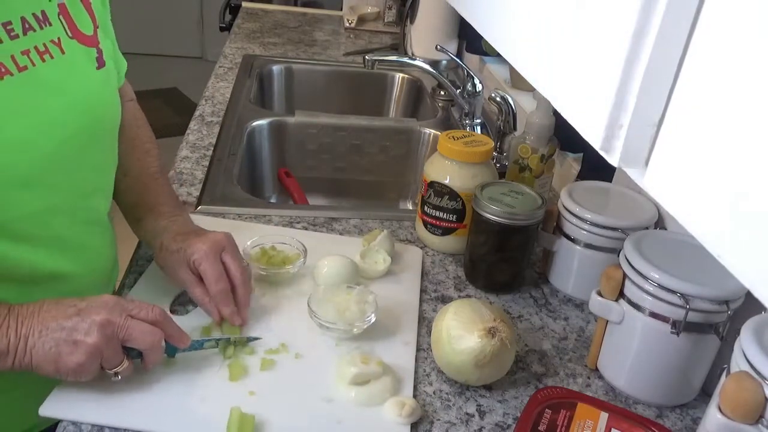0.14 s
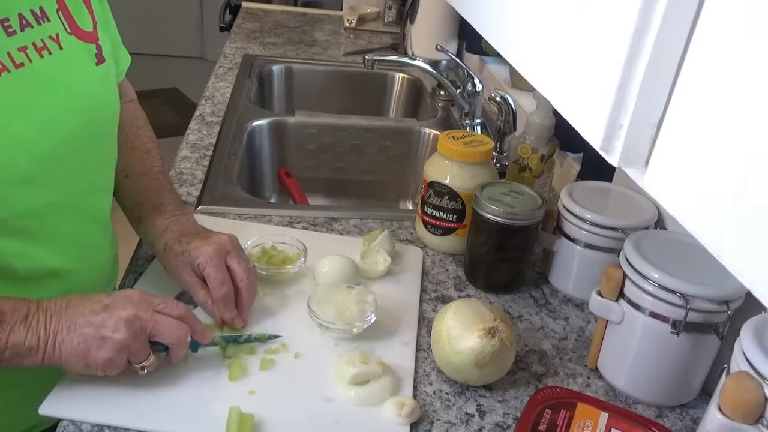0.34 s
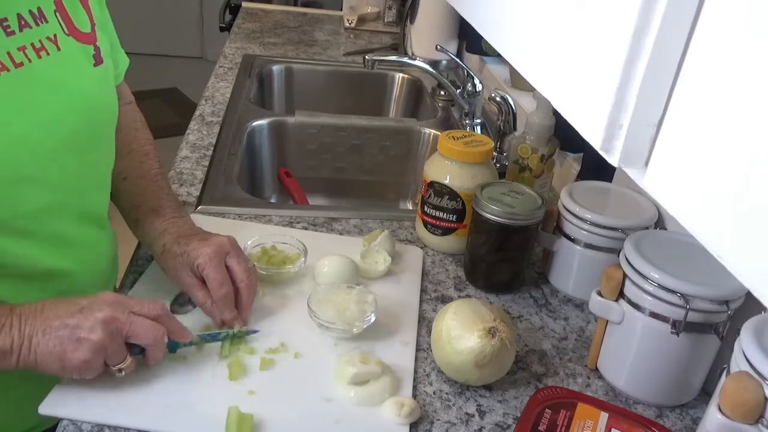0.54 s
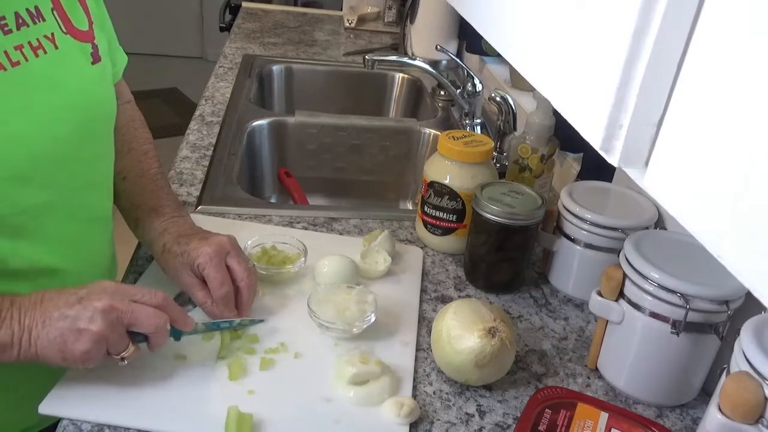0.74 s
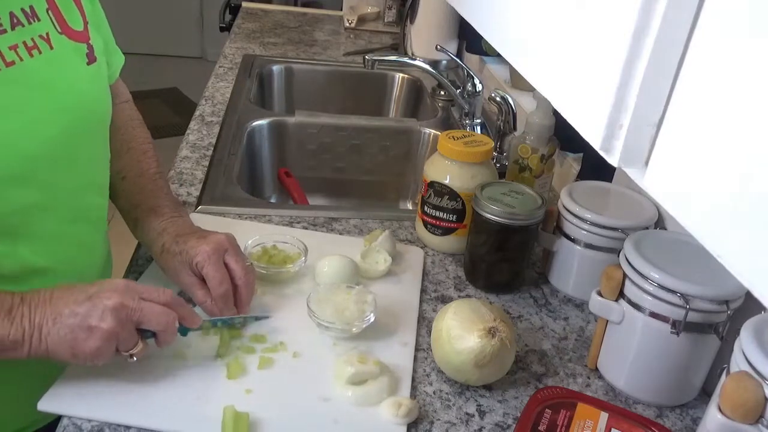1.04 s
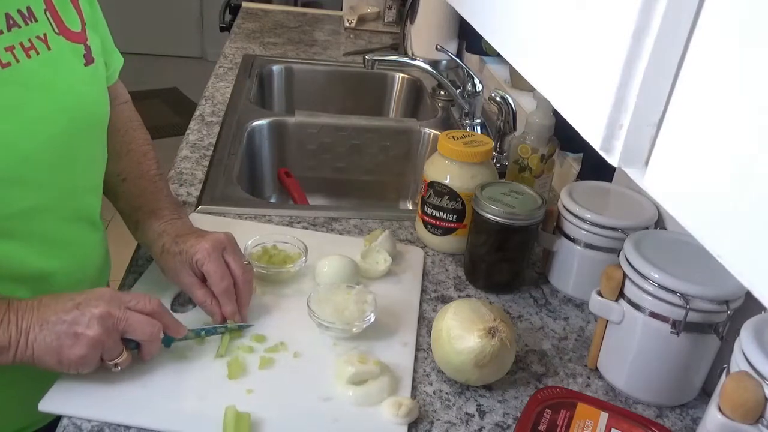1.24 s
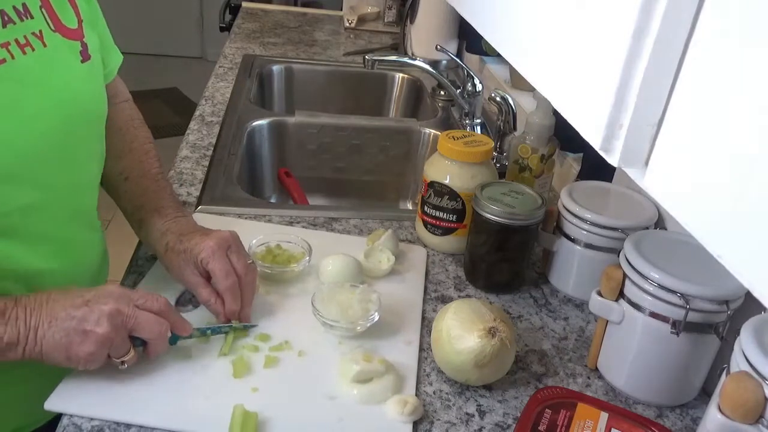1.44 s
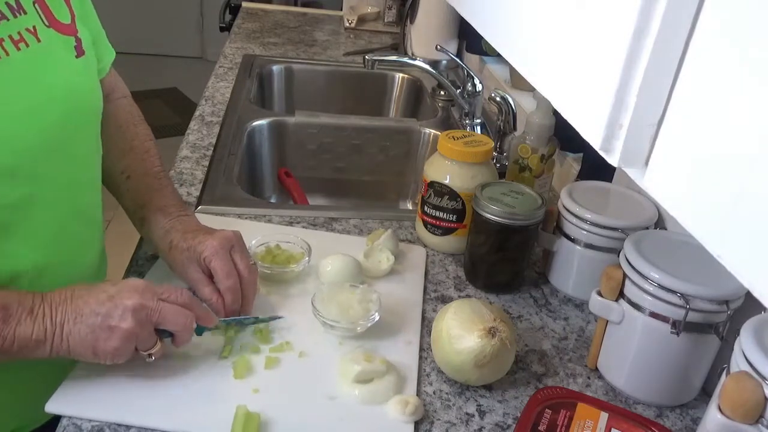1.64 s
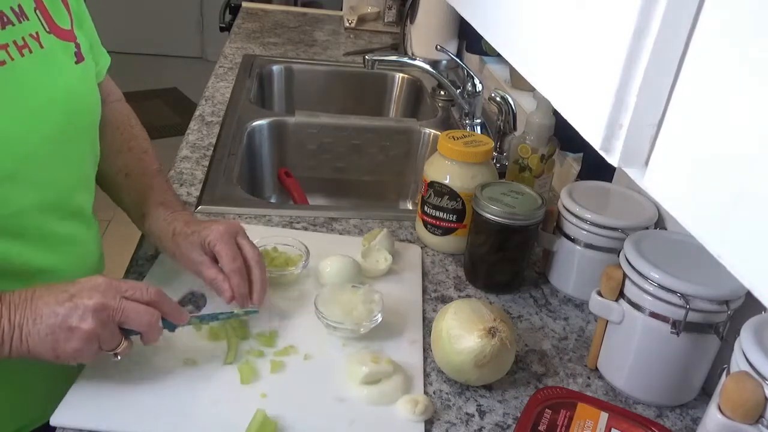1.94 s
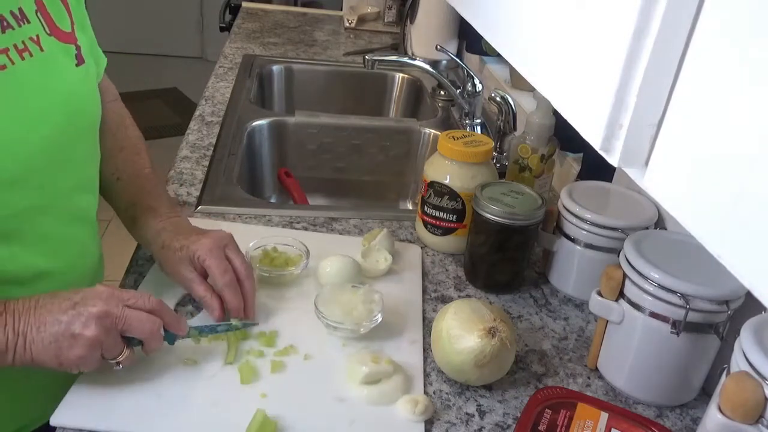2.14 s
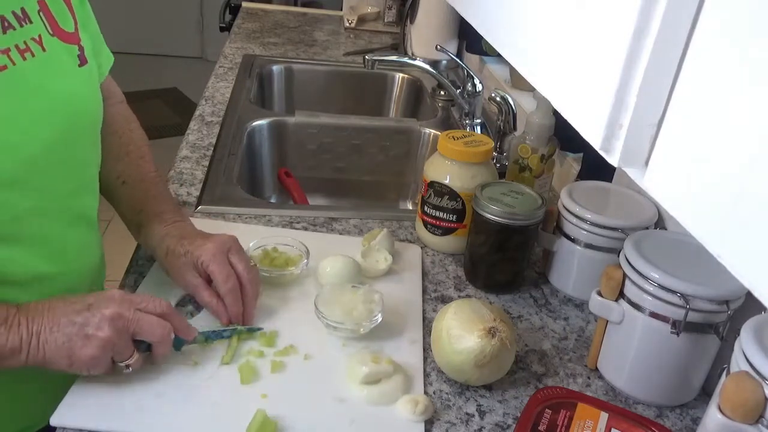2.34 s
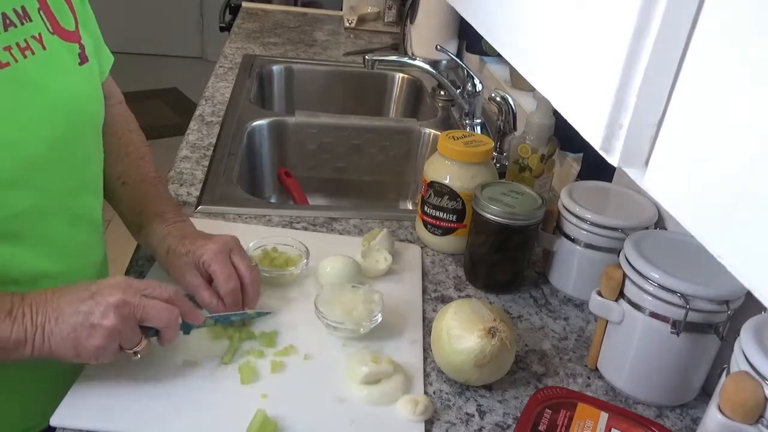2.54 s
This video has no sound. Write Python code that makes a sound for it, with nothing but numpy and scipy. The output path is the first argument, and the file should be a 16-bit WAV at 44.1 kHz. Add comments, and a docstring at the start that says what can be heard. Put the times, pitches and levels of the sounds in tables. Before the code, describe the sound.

Celery is chopped with a small knife on a plastic board, heard close up. Crackly snaps build into sharp, hollow knocks at about 0.25, 0.6 and 0.9 seconds. Softer crunches follow around 1.2, after a pause a knock at 1.5, then light blade taps near 1.8 and 2.2 and a crunchy last chop at 2.4. Faint rustling, short kitchen echo and low appliance hum surround it.

```python
"""Chopping celery

A small knife chops celery on a plastic board on a stone kitchen counter, heard close up.
Stroke by stroke, bursts of cracks excite stalk and blade, and landings ring the modes of the board.
Fingers rustle wet pieces (crackling noise), the blade tip taps (damped modes), the hard kitchen
answers (sparse decaying impulses) and appliances drone (shaped noise and wavering lines)."""
import sys
import numpy as np
from scipy import signal
from scipy.io import wavfile
from scipy.ndimage import uniform_filter1d

SR = 44100
rng = np.random.default_rng(int(sys.argv[2]) if len(sys.argv) > 2 else 0)


def convert_level_to_amplitude(level_db):
    """Map a level in decibels to its linear amplitude factor."""
    exponent = np.asarray(level_db, float) / 20
    return 10 ** exponent


def master(y):
    """Save y as 16-bit WAV."""
    cut = np.clip(np.atleast_2d(y).T, -1, 1)
    pcm = np.round(cut * 32767)  # scale
    wavfile.write(sys.argv[1], SR, pcm.astype(np.int16))


N = 119070
LOW_BELOW_HZ = 1300  # divides low from upper board modes
RISE_S = .0003  # onset of board and tip modes


def evened(x):
    """Scales to rms 1."""
    return x / np.sqrt(np.mean(x ** 2) + 1e-20)


def read(points, hz):
    """Interpolates (Hz, value) points on a log-frequency axis."""
    f, value = np.transpose(points)
    return np.interp(np.log(hz + 1), np.log(f + 1), value)


def add(mix, start_s, sound):
    """Mixes a sound in at a time."""
    part = mix[round(start_s * SR):][:len(sound)]
    part += sound[:len(part)]


def resonate(x, hz, width_hz):
    """Two-pole resonance of gain 1."""
    return signal.lfilter(*signal.iirpeak(min(hz, SR / 2.1), hz / width_hz, SR), x)


def modes(table, t):
    """Sum of dying sines; neighbours start in opposite directions."""
    return sum((-1) ** k * convert_level_to_amplitude(db - 60 * t / t60) * np.sin(2 * np.pi * hz * t)
               for k, (hz, db, t60) in enumerate(table))


def crisp():
    """Short causal filter with the colour of the stalk, energy 1."""
    # Colour of snaps. Each row: frequency in Hz, relative level in dB.
    colour_points = [(470, -31.5), (800, -12.5), (1800, -11), (2620, -11), (3760, -10), (4790, -10.5),
                     (5770, -8), (9250, -3), (11000, -17.5), (14300, -60), (22000, -120)]
    hz = np.fft.rfftfreq(256, 1 / SR)
    db = read(colour_points, np.minimum(hz, 10000))  # level held above 10 kHz
    # minimum_phase takes the root of the magnitude, hence twice the dB
    linear_phase = signal.firwin2(255, hz, convert_level_to_amplitude(2 * db) + 1e-5, fs=SR)
    colour = signal.minimum_phase(linear_phase)
    return colour / np.linalg.norm(colour)


def rustle():
    """Fingers shift the cut pieces: faint dense crackle of uneven noise grains."""
    # Loudness course. Each row: time in seconds, rms level in dB.
    loudness = [(0, -50), (.13, -58), (.2, -45.5), (.45, -63), (.53, -67.5), (1.41, -80), (1.47, -41),
                (1.52, -53), (2.15, -72), (2.25, -77), (2.6, -94), (2.7, -59)]
    unevenness = convert_level_to_amplitude(3 * rng.standard_normal(N // 100 + 1)).repeat(100)[:N]
    grains = rng.standard_normal(N) * unevenness
    high = np.diff(np.convolve(grains, crisp())[:N + 1])
    s, db = np.transpose(loudness)
    return convert_level_to_amplitude(np.interp(np.arange(N) / SR, s, db)) * evened(high)


def drone():
    """Appliances: patchy broadband noise and wavering motor lines, as mid and side."""
    # Noise spectrum. Each row: frequency in Hz, relative level in dB per Hz.
    spectrum = [(15, -42), (25, -14), (85, -12), (153, -27), (224, -7.5), (392, -9), (468, -4.5),
                (604, -17.5), (652, -16), (1030, -26.5), (1630, -25), (4290, -38), (5260, -35),
                (11000, -47), (14300, -73), (22000, -120)]
    # Width. Each row: frequency in Hz, side minus mid in dB.
    side_points = [(60, -17), (220, -27.5), (800, -8), (2900, -4.5), (10600, -4.5)]
    # Motor lines. Each row: frequency in Hz, level in dB rms before waver.
    lines = [(59, -64), (93, -59.5), (118, -63), (270, -63)]
    noise_db, patchy_db, waver_db = -46, 1.3, 1.2  # mid rms, then two rms spreads

    frames, hz = N // 512 + 5, np.fft.rfftfreq(2048, 1 / SR)
    a, b, c, d, patches = rng.standard_normal((frames, 1025, 5)).T
    patches = evened(uniform_filter1d(uniform_filter1d(patches, 10, 0), 6, 1))
    mid = a + 1j * b
    side = (c + 1j * d) * convert_level_to_amplitude(read(side_points, hz))[:, None]
    z = np.array([mid, side]) * convert_level_to_amplitude(read(spectrum, hz)[:, None] + patchy_db * patches)
    out = signal.istft(z, nperseg=2048, noverlap=1536)[1][:, :N]
    out *= convert_level_to_amplitude(noise_db) / np.sqrt(np.mean(out[0] ** 2))

    t = np.arange(N) / SR
    for f, db in lines:
        waver = evened(np.interp(t, np.arange(40) / 12, rng.standard_normal(40)))
        sine = np.sin(2 * np.pi * (f * t + rng.random()))
        out[0] += np.sqrt(2) * convert_level_to_amplitude(db + waver_db * waver) * sine
    return out


def taps():
    """Light taps of the blade tip: each rings three close, quickly damped modes."""
    # Each row: start in seconds, level per mode in dB, middle mode in Hz.
    tap_rows = [(.1445, -37, 2800), (1.808, -35, 3000), (2.204, -40, 3000)]
    t60_s = 0.0073
    out, t = np.zeros(N), np.arange(2000) / SR
    for s, db, hz in tap_rows:
        ring = modes([(hz * k, db, t60_s) for k in (.7, 1, 1.3)], t)
        add(out, s, ring * (1 - np.exp(-t / RISE_S)))
    return out


def snap(length_s, db, ring_hz, thump_db):
    """Uneven tiny cracks ring stalk and blade, trail off in tearing; the stalk is pushed on the board.

    Returns the near sound and the smoother colour that the walls receive from all directions."""
    # Stalk pushed on the board. Each row: frequency in Hz, relative level in dB, t60 in seconds.
    thump_modes = [(110, -17, 0.075), (236, -8, 0.04), (681, 5, 0.011)]
    # Blade modes woken by the cracks. Each row: frequency in Hz, relative mean level in dB.
    blade_modes = [(3900, -13), (5800, -11), (7600, -9), (9300, -10)]
    cracks_per_s, size_spread_db = 11000, 5
    rise_s, fade_s, thump_rise_s = 0.00026, .0015, 0.0023
    tear_db, tear_s, tears_per_s = -19, .012, 1500  # slower ragged tearing
    stalk_db, stalk_width_hz = -11, 800
    blade_spread_db, blade_width_hz = 4, 350

    t = np.arange(4000) / SR
    u = rng.random((len(t), 4))
    size = np.sign(u[:, 1] - .5) * convert_level_to_amplitude(-size_spread_db * np.log(u[:, 2] + 0.04))
    shape = np.minimum(t / rise_s, 1) * np.exp(-np.maximum(t - length_s, 0) / fade_s)
    cracks = shape * size * (u[:, 0] < cracks_per_s / SR)
    cracks *= np.linalg.norm(shape) / np.linalg.norm(cracks)
    cracks += convert_level_to_amplitude(tear_db) * np.exp(-t / tear_s) * size * (u[:, 3] < tears_per_s / SR)

    wide = np.convolve(cracks, crisp())[:len(t)]
    stalk_gain = convert_level_to_amplitude(stalk_db) * np.sqrt(SR / stalk_width_hz / np.pi)
    ring = stalk_gain * resonate(cracks, ring_hz, stalk_width_hz)
    for (hz, mode_db), a in zip(blade_modes, rng.standard_normal(len(blade_modes))):
        gain = convert_level_to_amplitude(mode_db + blade_spread_db * a) * np.sqrt(SR / blade_width_hz / np.pi)
        ring += gain * resonate(cracks, hz, blade_width_hz)
    thump = convert_level_to_amplitude(thump_db) * modes(thump_modes, t) * (1 - np.exp(-t / thump_rise_s))

    spread = thump.copy()
    add(spread, length_s / 2, np.linalg.norm(shape) * crisp())
    return convert_level_to_amplitude(db) * (wide + ring + thump), convert_level_to_amplitude(db) * spread


def blow(db, tick_db, low_db, tilt_db):
    """Blade lands: a sharp tick of the edge, then board modes, changed a little by random draws.

    Returns tick, ring and the ring as sent to all sides, where modes merge into broader ones."""
    # Board and blade. Each row: frequency in Hz, relative level in dB, t60 in seconds.
    board_modes = [(202, -16, 0.028), (430, -14.5, 0.013), (549, -10.5, 0.035), (713, -3, 0.043),
                   (1096, -4, 0.012), (1360, -5, 0.0033), (1684, -1.5, 0.0094), (2076, 6, 0.0074),
                   (2554, 3, 0.012), (2980, 9, 0.015), (2985, 8.5, 0.011), (3172, 0, 0.0089),
                   (4600, -15, 0.0048)]
    detune, ring_lag_s = .008, 0.00097
    upper_t60_max_s, spread_t60_s = .013, .005
    tick_gain_db, tick_hz, tick_s = 6.5, 4400, .00012

    t = np.arange(5000) / SR
    draw = rng.standard_normal((len(board_modes), 2))
    here = []
    for (f, d, t60), (a, b) in zip(board_modes, draw):
        if f < LOW_BELOW_HZ:
            d = d + low_db
        else:
            d = d + tilt_db * np.log2(f / 2200)
            t60 = min(t60, upper_t60_max_s)
        here.append((f * (1 + detune * a), d + b, t60))
    ring = np.zeros(len(t))
    add(ring, ring_lag_s, modes(here, t) * (1 - np.exp(-t / RISE_S)) / 2)

    at = t - 2 * tick_s
    pulse = np.exp(-(at / tick_s) ** 2) * np.sin(2 * np.pi * tick_hz * at)
    tick = -convert_level_to_amplitude(tick_gain_db + tick_db) * pulse

    merged = []
    for f, d, t60 in here:
        short_t60 = min(t60, spread_t60_s)
        merged.append((f, d + 10 * np.log10(t60 / short_t60), short_t60))  # same energy
    spread = modes(merged, t) / 2
    return convert_level_to_amplitude(db) * tick, convert_level_to_amplitude(db) * ring, convert_level_to_amplitude(db) * spread


def echoes(x):
    """Direct sound plus first reflections, which return mostly the upper modes."""
    # Counter and walls. Each row: delay in seconds, level in dB.
    reflections = [(.0016, -17), (.0036, -2), (.0064, -4.5), (.0085, -3.5), (.011, -4)]
    out = x.copy()
    upper = signal.lfilter(*signal.butter(2, LOW_BELOW_HZ, "high", fs=SR), x)
    for k, (delay_s, db) in enumerate(reflections):
        add(out, delay_s, (-1) ** k * convert_level_to_amplitude(db) * upper)
    return out


def kitchen(x):
    """Reverberation: sparse impulses dying band by band, three tails in turn; mid and side."""
    # Decay. Each row: frequency in Hz, t60 in seconds.
    decay = [(200, 0.39), (530, 0.36), (1390, 0.38), (3680, 0.32), (9700, 0.31)]
    # Width. Each row: frequency in Hz, side minus mid in dB.
    side_points = [(150, -24), (500, -10), (2000, -6.5), (9000, -7)]
    build_s, turn_rad_per_s = 0.0017, 9
    out, count = np.zeros((2, N)), SR // 2
    for k in range(3):
        impulses = np.zeros((2, count))
        at = np.arange(100, count - 20, 20)
        at = at + rng.integers(0, 20, (2, len(at)))
        np.put_along_axis(impulses, at, rng.choice([-1., 1.], at.shape), 1)
        hz, t, z = signal.stft(impulses, SR, nperseg=256)
        z[1] *= convert_level_to_amplitude(read(side_points, hz))[:, None]
        fading = convert_level_to_amplitude(-60 * t / read(decay, hz)[:, None])
        tail = signal.istft(z * fading, SR, nperseg=256)[1]
        tail *= 1 - np.exp(-np.arange(tail.shape[1]) / SR / build_s)
        tail /= np.linalg.norm(tail[0])
        # squares of the three weights sum to 1
        turn = np.sqrt(2 / 3) * np.cos(np.arange(N) / SR * turn_rad_per_s + k * np.pi / 3)
        out += signal.fftconvolve((x * turn)[None], tail, axes=1)[:, :N]
    return out


def scene():
    """Blows, snaps, taps and rustle in the kitchen over the drone."""
    # Fibres snap. Each row: start in seconds, length in seconds.
    snap_times = [(.159, .004), (.19, .006), (.2355, .002), (.2424, .0014), (.345, .003), (.37, .003),
                  (.42, .003), (.548, .005), (.5535, .002), (.5745, .005), (.5875, .0015), (.5905, .002),
                  (.5972, .002), (.6085, .0012), (.868, .005), (.8875, .008), (.909, .006), (.9155, .0025),
                  (1.064, .004), (1.202, .007), (1.225, .003), (1.259, .008), (1.29, .007), (1.466, .001),
                  (1.48, .003), (1.4875, .001), (1.672, .003), (2.2, .008), (2.263, .003), (2.29, .001),
                  (2.2922, .002), (2.297, .003), (2.319, .008), (2.353, .002), (2.367, .001),
                  (2.3715, .001), (2.375, .0015), (2.379, .006), (2.665, .006)]
    # Each row, per snap: level in dB, stalk ring in Hz, relative thump level in dB.
    snap_rows = [(-40, 11000, -24), (-41.5, 7400, -18), (-43, 4500, -20), (-21.5, 5100, -48),
                 (-33, 6900, -2), (-39, 6900, -11), (-39, 9000, -23), (-29.5, 7100, 1.5), (-24.5, 6600, 5),
                 (-30.5, 5200, -53), (-23.5, 9500, -5.5), (-21.5, 8300, -3.5), (-24.5, 7600, -42),
                 (-17.5, 10000, -30), (-37, 5100, 10), (-28, 7900, 7.5), (-32, 8300, -11), (-25, 5500, -31),
                 (-47, 6500, -20), (-37.5, 9300, 8), (-26, 7100, -12), (-24, 7800, -1), (-35, 6700, 1),
                 (-37.5, 19000, -12), (-20.5, 4800, -41), (-25, 10500, -22), (-52, 7600, -16),
                 (-44.5, 7500, -15), (-39, 9700, -16), (-32, 5600, -19), (-21, 7400, 3.5),
                 (-26, 15000, -26), (-23, 8300, -5), (-45, 8300, -4), (-25, 15000, -42), (-22, 5600, -50),
                 (-21, 11000, -42), (-26, 6500, -29), (-40, 9300, 6)]
    # Blade lands on the board: start in seconds.
    blow_times = [.2465, .6159, .9206, 1.4875, 2.3845]
    # Each row, per landing: level, tick and low modes in dB, tilt of upper modes in dB per octave.
    blow_rows = [(-9.5, 1.5, -3.5, -2.5), (-12, 0.5, 0.5, 0), (-8.5, -5.5, 2.5, -4.5),
                 (-12.5, -5.5, 0, 6.5), (-13.5, -11, 5, -10)]
    # How strongly the kitchen answers each landing, relative, in dB.
    blow_sends_db = [1.5, 2, -4, 0.9, -9]
    tick_send_db, ring_send_db, snap_send_db, tip_send_db = 6, 7.5, 1.5, -1
    pan_db = .3  # left up, right down

    snaps = rustle()
    snaps_sent = snaps.copy()
    ticks, rings, rings_sent = np.zeros((3, N))
    for s, row, sent_db in zip(blow_times, blow_rows, blow_sends_db):
        tick, ring, spread = blow(*row)
        add(ticks, s, tick)
        add(rings, s, ring)
        add(rings_sent, s, convert_level_to_amplitude(sent_db) * spread)
    for (s, length_s), row in zip(snap_times, snap_rows):
        close, spread = snap(length_s, *row)
        add(snaps, s, close)
        add(snaps_sent, s, spread)
    tips = taps()

    sent = convert_level_to_amplitude(tick_send_db) * ticks + convert_level_to_amplitude(ring_send_db) * rings_sent
    sent += convert_level_to_amplitude(snap_send_db) * snaps_sent + convert_level_to_amplitude(tip_send_db) * tips
    mid, side = kitchen(sent) + drone()
    near = ticks + echoes(rings) + snaps + tips
    return np.array([mid + side + near * convert_level_to_amplitude(pan_db), mid - side + near * convert_level_to_amplitude(-pan_db)])


def band_limit(x):
    """A steep low-pass at the top of the band."""
    return signal.sosfilt(signal.butter(12, 11170, fs=SR, output="sos"), x)


def record(dry):
    """Dulls the top treble: a steep lowpass leaves it 14 dB down."""
    edge_hz, above_edge_db = 10916, -14
    lowpass = signal.firwin(511, edge_hz, window=("kaiser", 9), fs=SR)
    low = signal.oaconvolve(dry, lowpass[None], "same")
    return band_limit(low + convert_level_to_amplitude(above_edge_db) * (dry - low))


dry = scene()
out = record(dry)
master(out)
```